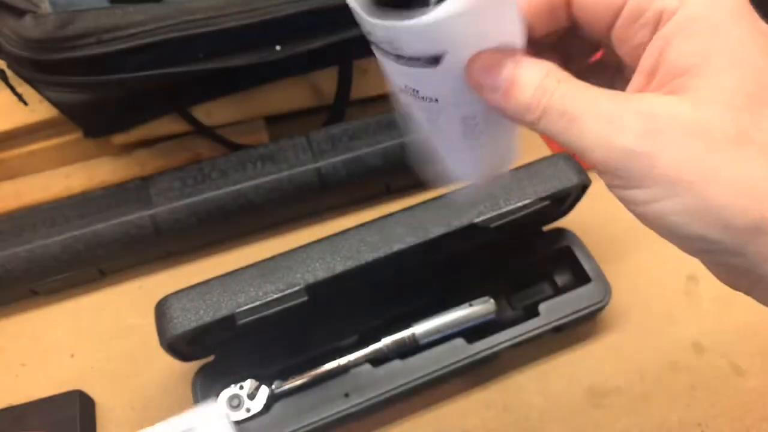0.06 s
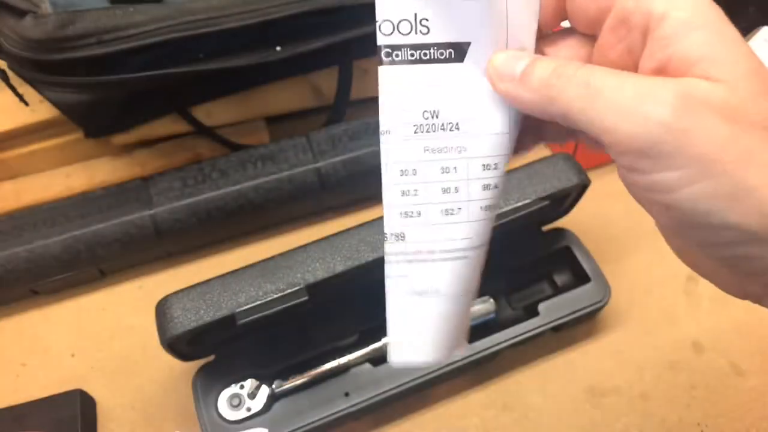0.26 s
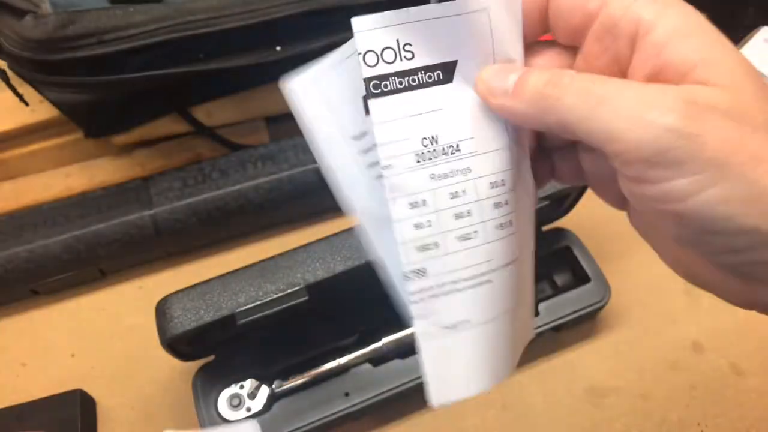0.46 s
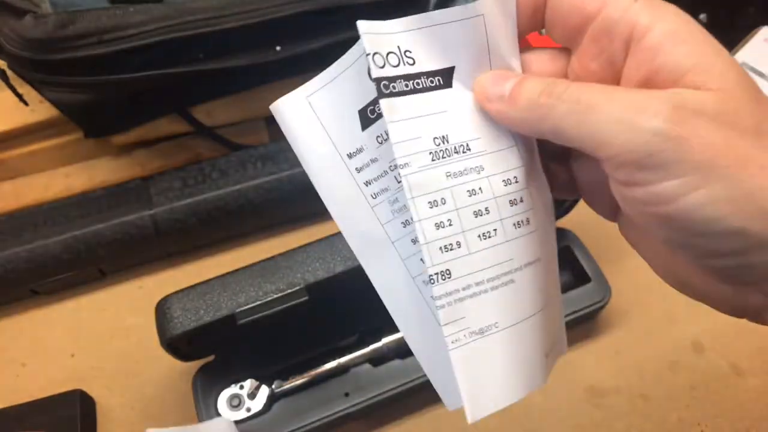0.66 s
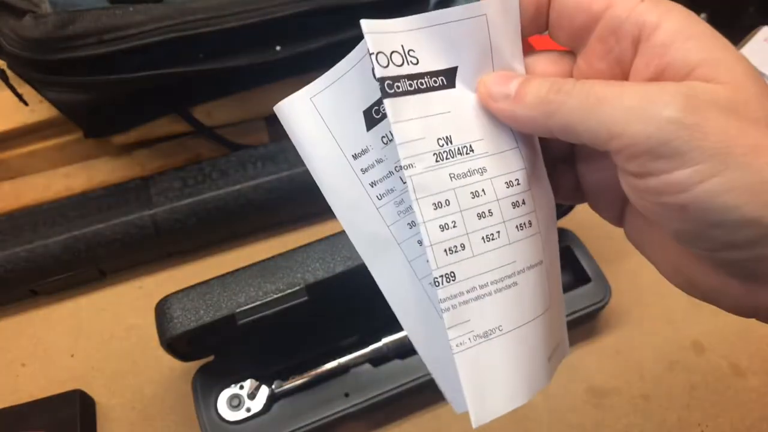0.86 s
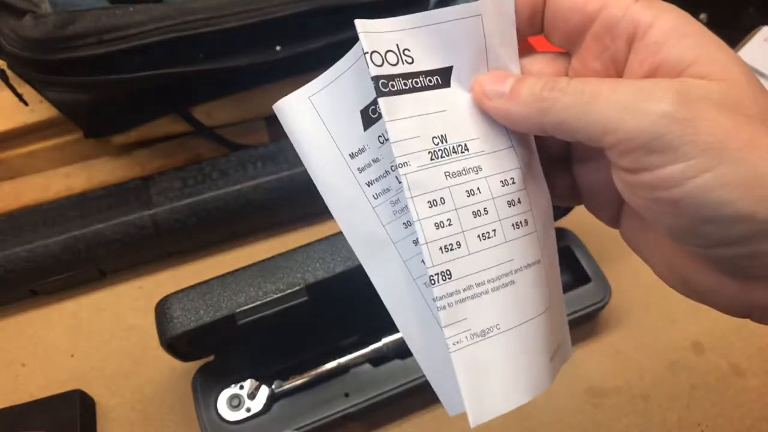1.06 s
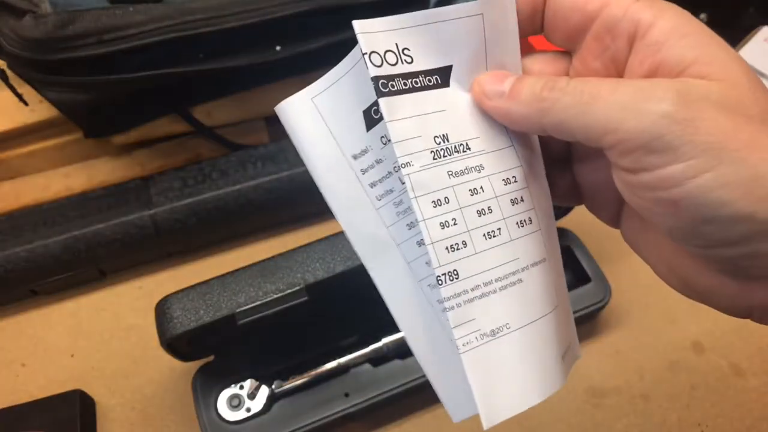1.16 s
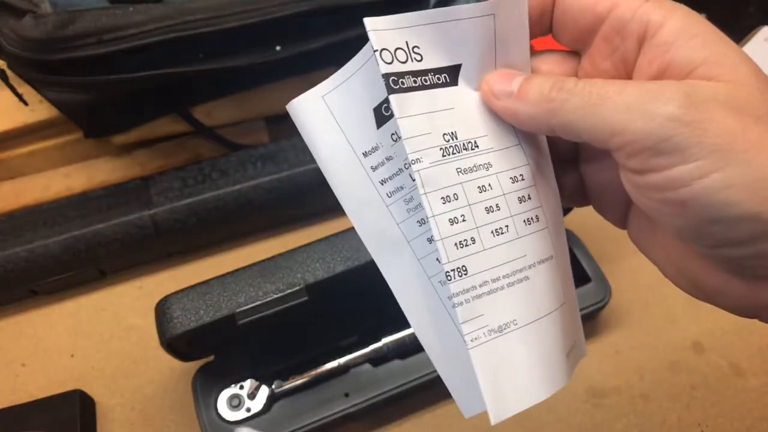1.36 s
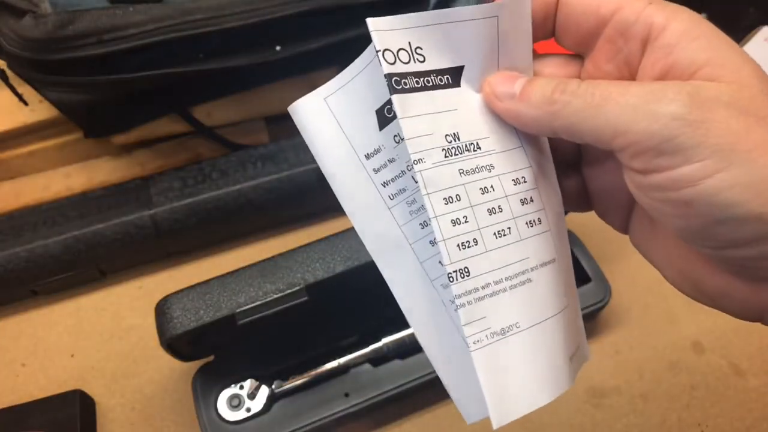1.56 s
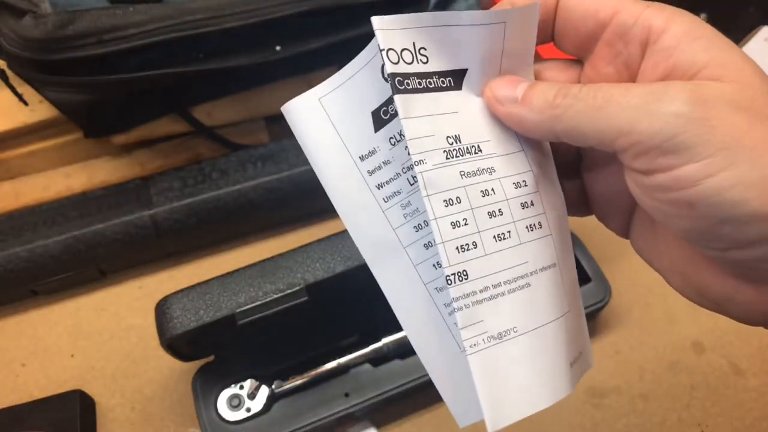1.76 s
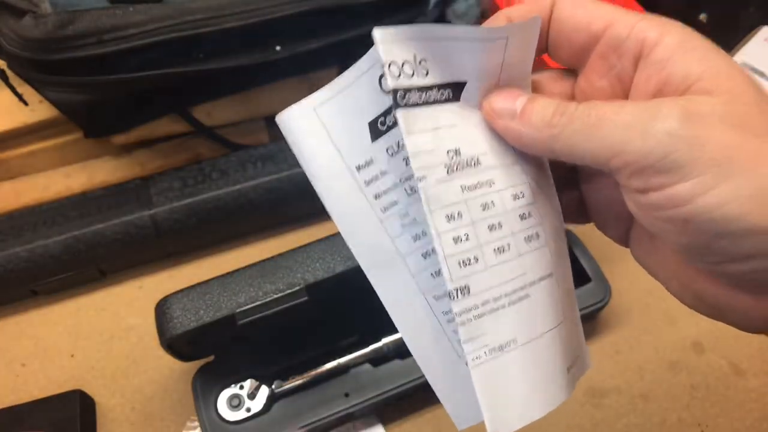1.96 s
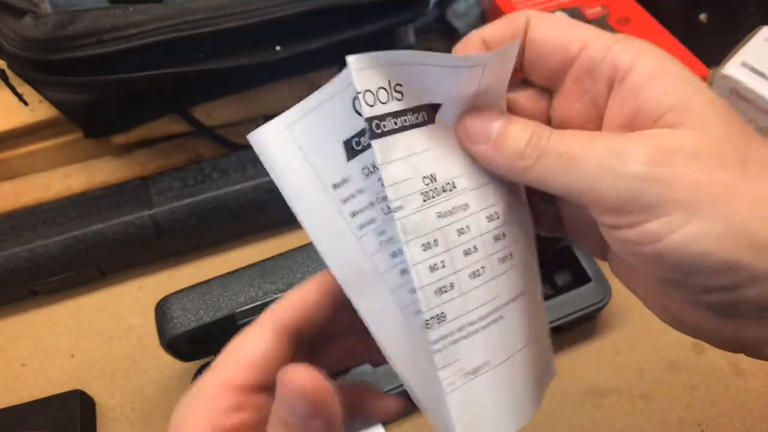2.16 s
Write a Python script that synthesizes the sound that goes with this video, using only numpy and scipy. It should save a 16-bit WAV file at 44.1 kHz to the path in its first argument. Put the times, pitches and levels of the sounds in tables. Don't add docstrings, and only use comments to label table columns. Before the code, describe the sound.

Folded paper sheets crackle and snap open in the hand, with low soft bumps on a bench

```python
import sys
import numpy as np
from scipy import signal
from scipy.fft import rfft, irfft
from scipy.io import wavfile
from scipy.ndimage import uniform_filter1d

SR = 44100
rng = np.random.default_rng(int(sys.argv[2]) if len(sys.argv) > 2 else 0)


def makeup_ratio(level_db):
    decades = np.asarray(level_db, float) / 20
    return 10 ** decades


def wav_record(signal):
    frames = np.transpose(np.atleast_2d(signal))
    bounded = np.clip(frames, -1, 1)
    quanta = np.round(bounded * 32767).astype(np.int16)
    wavfile.write(sys.argv[1], SR, quanta)


N = 97020

# pitch_hz [Hz], width_hz [Hz], level_db [dB]
SHEET_MODES = [(1330, 25, -5), (1620, 55, 2), (2000, 310, -1), (2480, 35, -3), (2940, 260, -7.5),
               (3920, 370, -12), (5900, 220, -20)]


def unit(x):
    return x / np.sqrt(np.mean(x ** 2))


def colour(x, points):
    points = np.array(points, float)
    hz = np.arange(len(x) // 2 + 1) * SR / len(x) + 1
    gain_db = np.interp(np.log(hz), np.log(points[:, 0]), points[:, 1])
    return irfft(rfft(x) * makeup_ratio(gain_db), len(x))


def band(x, hz, width):
    return signal.lfilter(*signal.iirpeak(hz, hz / width, fs=SR), x)


def lowpass(hz):
    return signal.butter(2, hz, fs=SR, output="sos")


def treble(x, hz=6000):
    return signal.sosfilt(signal.butter(2, hz, "high", fs=SR, output="sos"), x)


def walk(rate):
    hold = int(SR / rate)
    steps = np.repeat(rng.standard_normal(N // hold + 1), hold)
    return 2.09 * uniform_filter1d(uniform_filter1d(steps, hold), hold)[:N]


def whistle(rows):
    t = np.arange(N) / SR
    start_s, pitch_hz, level_db = np.array(rows, float).T
    hz = np.interp(t, start_s, pitch_hz) * (1 + 0.0035 * walk(40))
    level = makeup_ratio(np.interp(t, start_s, level_db) + 1.5 * walk(70))
    return np.sin(2 * np.pi * np.cumsum(hz) / SR) * level


def shop():
    # pitch_hz [Hz], level_db [dB per Hz]
    air_colour = [(12, -53), (20, 10), (91, -1.5), (297, -9), (332, -7), (794, -20.5), (3230, -26),
                  (14700, -45), (16500, -64)]
    # time_s [s], level_db [dB]
    rumble = [(0, -50.5), (.2, -51.5), (.9, -55.5), (1.3, -54.5), (1.65, -54), (1.78, -53), (1.95, -54),
              (2.2, -49)]
    # time_s [s], pitch_hz [Hz], level_db [dB]
    far_whistle = [(1.72, 3450, -85), (1.77, 3370, -67), (1.9, 3290, -66), (1.95, 3150, -66),
                   (2.0, 3120, -85)]
    # time_s [s], pitch_hz [Hz], level_db [dB]
    squeals = [
        [(1.74, 4850, -85), (1.77, 4770, -69), (1.85, 4480, -67), (1.88, 4400, -85)],
        [(1.8, 5950, -85), (1.84, 5880, -74), (1.9, 5780, -75), (1.95, 5650, -85)],
    ]
    air = unit(colour(rng.standard_normal(N), air_colour)) * makeup_ratio(-47)
    low = signal.sosfilt(lowpass(280), air)
    time_s, level_db = np.array(rumble, float).T
    swing_db = np.interp(np.arange(N) / SR, time_s, level_db + 54) + 0.4 * walk(30)
    tones = whistle(far_whistle) + sum(whistle(rows) for rows in squeals)
    return air + low * (makeup_ratio(swing_db) - 1) + tones


def knock():
    # start_s [s], level_db [dB], pitch_hz of the hollow [Hz], fade_s to -60 dB [s]
    knocks = [
        (0, -41.5, 104, 0.21),
        (0.091, -40.5, 253, 0.25),
        (0.271, -44, 259, 0.17),
        (0.665, -45, 520, 0.083),
        (0.688, -38.5, 185, 0.17),
        (0.486, -47, 229, 0.07),
        (2.09, -42, 105, .4),
        (0, -48, 300, .5),
        (2.1, -35.5, 250, 0.19),
    ]
    out = np.zeros(N)
    for start_s, level_db, hz, fade_s in knocks:
        t = np.arange(N) / SR - start_s
        env = np.clip(t / 0.0032, 0, 1) * makeup_ratio(level_db - 60 * np.clip(t, 0, 9) / fade_s)
        hollow = band(band(rng.standard_normal(N), hz, 0.62 * hz), hz, 0.99 * hz)
        out += env * unit(hollow)
    return out


def bumps():
    # crest_s [s], crest_db [dB], pitch_hz [Hz], ring_cycles [cycles], sign [+1 or -1]
    bench_bumps = [(.205, -35.5, 40.3, 0.56, -1), (.254, -19, 56, 1.17, 1), (0.309, -20.5, 60.7, 0.88, 1),
                   (0.345, -23, 46.3, 1.17, 1), (.407, -15.5, 54, 1.1, 1), (.443, -23, 52.4, 1.7, 1),
                   (.496, -11.5, 67, 0.67, 1), (0.535, -23, 41.7, 0.9, 1), (0.704, -18.5, 66.4, 0.99, 1),
                   (0.739, -28.5, 63, 0.61, 1), (0.762, -28.5, 53.5, 0.98, 1), (1.02, -46, 40, 1.0, 1),
                   (1.1, -48, 40, 1.7, 1), (0.861, -47, 45, 1.5, 1), (.94, -41.5, 45.3, 1.8, 1),
                   (1.31, -43.5, 45, 1.0, 1), (1.351, -42, 42.3, 0.63, 1), (1.412, -38, 48.2, 1.7, 1),
                   (1.58, -45, 46, 1.2, 1), (1.692, -45, 49.5, 0.73, -1), (1.813, -38, 46, 0.93, -1),
                   (2.145, -37, 43.5, 0.9, 1), (2.168, -40, 50, .8, 1)]
    lead_cycles, sag = 0.42, 0.8
    t, out = np.arange(N) / SR, np.zeros(N)
    for crest_s, crest_db, hz, ring_cycles, sign in bench_bumps:
        cycles = np.clip((t - crest_s) * hz, -2, 9)
        phase = (1 - np.exp(-sag * cycles)) / sag * 0.62 + 0.44 * cycles
        spread = np.where(cycles < 0, lead_cycles, ring_cycles)
        env = np.exp(-(cycles / spread) ** 2 / 2)
        out += np.sign(sign) * makeup_ratio(crest_db) * env * np.cos(2 * np.pi * phase)
    return out


def patchy(x, patchy_db, rate):
    lows = [signal.sosfiltfilt(lowpass(hz), x) for hz in 1200 * 1.85 ** np.arange(5)]
    out = np.zeros(N)
    for part in np.diff([0 * x] + lows + [x], axis=0):
        even = part * np.sqrt(np.mean(part ** 2) / uniform_filter1d(part ** 2, size=2600))
        out += even * makeup_ratio(patchy_db * walk(rate))
    return out


def clicks(per_s, spread_db, most_db):
    happens = rng.random(N) < per_s / SR
    strength = makeup_ratio(np.minimum(spread_db * rng.exponential(size=N), most_db))
    return happens * strength * rng.standard_normal(N)


def crinkles(per_s):
    out = np.zeros(N)
    for hz in 1900 * 1.4 ** np.arange(6):
        kicks = clicks(per_s, 3.4, 13)
        out += unit(band(band(kicks, hz, 0.32 * hz), hz, 0.59 * hz)) * hz ** 0.11
    return unit(out)


def rustle():
    # start_s [s], hold_s [s], fade_s to -60 dB [s], level_db [dB], treble_db [dB]
    strokes = [(-.02, 0.028, 0.61, -45.5, -2), (0.062, 0.052, 0.67, -48, -7),
               (0.248, 0.032, 0.49, -45, -2.5), (0.382, 0.24, 1, -62.5, 3.5), (0.672, 0.12, 0.63, -54, 0.5),
               (0.831, 0.11, 0.54, -59.5, 8), (0.905, 0.096, 0.36, -51.5, -3),
               (1.016, 0.094, 0.28, -53.5, 4), (1.1, 0.022, .2, -57, 2), (1.148, 0.052, 0.45, -57, 7),
               (1.203, 0.013, 0.26, -49, 3), (1.254, .05, 0.56, -58, 3), (1.28, 0.076, 0.6, -51, 3.5),
               (1.37, 0.045, .2, -56, -3), (1.474, 0.033, 0.77, -51, -0.5),
               (1.571, 0.084, 0.25, -49.5, -2.5), (1.65, 0.096, 0.35, -53, 0),
               (1.97, 0.047, 0.37, -64.5, -1), (2.072, 0.07, 0.19, -45, -11)]
    # pitch_hz [Hz], level_db [dB per Hz]
    rub_colour = [(290, -32), (500, 3.5), (739, 0.5), (1300, 0.5), (1780, -7.5), (2380, -3), (10400, -5.5),
                  (14500, -1), (15800, -7.5)]
    grains = clicks(2500, 1.6, 11)
    rub = 0.5 * unit(band(grains, 3940, 7200)) + 0.36 * crinkles(per_s=130) + rng.standard_normal(N)
    rub = rub + 0.69 * sum(makeup_ratio(db) * band(rub, hz, 1.95 * width) for hz, width, db in SHEET_MODES)
    rub = patchy(unit(colour(rub, rub_colour)), patchy_db=1.17, rate=35) * makeup_ratio(0.83 * walk(45.15))
    top = treble(rub)
    body = rub - top

    t = np.arange(N) / SR
    body_power, top_power = np.zeros(N), np.zeros(N)
    for start_s, hold_s, fade_s, level_db, treble_db in strokes:
        rise = np.clip((t - start_s) / (0.24 * hold_s), 0, 1)
        fade = makeup_ratio(level_db - 60 * np.clip(t - start_s - hold_s, 0, 9) / fade_s)
        power = (rise * fade) ** 2
        body_power += power
        top_power += makeup_ratio(2 * treble_db) * power
    return body * np.sqrt(body_power) + top * np.sqrt(top_power)


def snaps(rows):
    length = 4096
    out, t = np.zeros(N + length), np.arange(length) / SR
    for start_s, peak_db, hz, treble_db, fade_s in rows:
        release, hiss, ragged = rng.standard_normal((3, length))
        env = np.minimum(t / 0.00026, 1) * makeup_ratio(-60 * t / max(fade_s, 0.003))
        release[:3] += 2.0
        burst = release * env * makeup_ratio(11.0 * uniform_filter1d(ragged, size=24))
        sheet = sum(makeup_ratio(db) * band(burst, mode_hz, 5 * width) for mode_hz, width, db in SHEET_MODES)
        patch = band(burst, hz, 0.13 * hz)
        crack = band(band(burst, 0.93 * hz, 1.3 * hz), 0.93 * hz, 1.3 * hz)
        ring = patch + 0.21 * crack + 0.16 * band(sheet, hz, 0.9 * hz)
        top = treble(hiss * env ** 0.91, hz=7600)
        snap = ring / abs(ring).max() + makeup_ratio(treble_db + 3.5) * top / abs(top).max()
        i = int(start_s * SR)
        out[i:i + length] += makeup_ratio(peak_db) * snap
    return out[:N]


def hand_ticks():
    # start_s [s], peak_db [dB], pitch_hz [Hz], treble_db [dB], fade_s to -60 dB [s]
    ticks = [(0.9118, -44, 4150, 2, 0.019), (0.9364, -43, 2360, 2, 0.015), (1.0041, -38.5, 2260, 7, 0.018),
             (1.0104, -40, 2150, 0.5, 0.048), (1.0914, -48, 2480, 1, 0.024), (1.1503, -29, 2600, 1, 0.0041),
             (1.2086, -34.5, 1650, -3, 0.037), (1.2191, -36, 2140, -7, 0.03),
             (1.2994, -36, 1980, -20, 0.025), (1.3125, -36.5, 2480, -5, 0.026),
             (1.321, -40.5, 2280, 1, 0.075), (1.3474, -40, 3630, -1, 0.02), (1.362, -46, 1980, -10, 0.043),
             (1.393, -45, 1090, -2, .02), (1.4, -40.5, 2900, -17, 0.038), (1.482, -40, 2120, -14, 0.04),
             (1.5753, -39, 2900, -0.5, 0.0077), (1.5804, -38, 3600, -10, 0.026),
             (1.6107, -39.5, 3280, 1, 0.046), (1.6894, -50, 2500, 9, 0.013), (1.7419, -45, 6470, -14, 0.04),
             (1.8115, -38.5, 1160, -40, .025), (1.988, -49, 1820, -8, 0.036),
             (2.078, -42, 2340, -17, 0.022), (2.0862, -36.5, 1370, -19, 0.01),
             (2.0955, -39, 3200, -8, 0.017), (2.1012, -37, 3340, 0, 0.016), (2.1016, -37, 1310, -30, 0.019),
             (2.11, -35, 1330, -4, 0.011), (2.1135, -30, 2920, -8, 0.018), (2.1225, -33, 1290, -6, 0.013),
             (2.1266, -34.5, 1360, -18, 0.022), (2.1374, -34, 2380, -16, 0.011),
             (2.1525, -40, 2380, 2, 0.0096), (2.176, -38, 1200, -35, 0.019), (2.1775, -41, 2800, -30, .015)]
    return snaps(ticks)


def opening_snaps():
    # start_s [s], peak_db [dB], pitch_hz [Hz], treble_db [dB], fade_s to -60 dB [s]
    creases = [(.0265, -29.5, 3650, -22, 0.0081), (.0426, -27, 4000, -6, 0.04),
               (.05, -33.5, 2960, -5, 0.027), (.085, -32.5, 1000, -16, 0.013),
               (.0967, -20, 2100, -18, 0.02), (.111, -31, 2850, -20, 0.084),
               (.172, -41.5, 3500, -3.5, 0.021), (.2552, -39, 3950, -3, .03), (.2632, -29, 3970, -2, 0.027),
               (.2652, -28, 3770, 1.5, 0.022), (.2648, -33, 1350, -30, 0.024),
               (.2779, -23.5, 2530, -15, 0.032), (.2792, -38, 880, -30, 0.016),
               (.3071, -30.5, 2300, -10, 0.016), (.3078, -32.5, 910, -30, 0.017),
               (.3232, -32, 2670, -32, 0.011), (.3245, -35, 960, -30, 0.026), (.4174, -56, 3520, 10, 0.022),
               (.4448, -50, 4020, 6.5, .029), (.4758, -40, 3920, 0, 0.025), (.5006, -40.5, 3820, -7, 0.023),
               (.5524, -46, 1600, -20, 0.022), (.6012, -48, 5450, -5, 0.057), (.664, -46, 1310, -30, 0.036),
               (.677, -41, 3870, -15, 0.042), (.729, -50, 3000, 1, .015), (.7345, -45, 2800, 6, .03),
               (.762, -45.5, 2600, 4, 0.06)]
    return snaps(creases)


def room(x):
    t = np.arange(SR // 2) / SR
    tail = band(rng.standard_normal(len(t)), 1300, 4100)
    tail = tail * makeup_ratio(-60 * t / 0.2) * np.clip(t / 0.00083, 0, 1)
    return signal.fftconvolve(x, tail / np.sqrt((tail ** 2).sum()))[:N]


def scene():
    paper = opening_snaps() + hand_ticks() + rustle()
    mix = shop() + knock() + bumps() + paper + makeup_ratio(-14) * room(paper)
    return mix[None]


def band_limit(x):
    return signal.sosfilt(signal.butter(12, 16820, fs=SR, output="sos"), x)


def record(dry):
    dipped = dry - 0.68 * band(dry, 10440, 270)
    top_cut = signal.ellip(12, 0.2, 70, 15800, fs=SR, output="sos")
    return band_limit(signal.sosfilt(top_cut, dipped))


dry = scene()
out = record(dry)
wav_record(out)
```